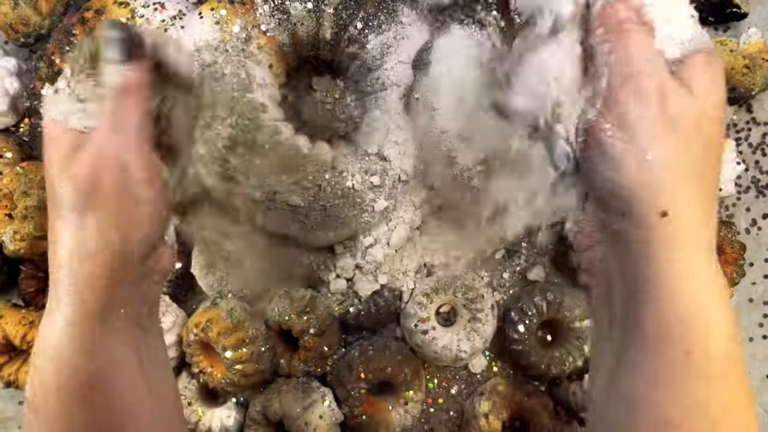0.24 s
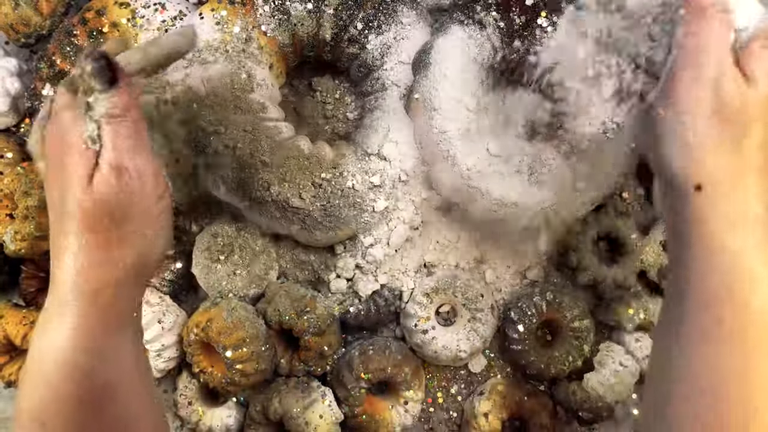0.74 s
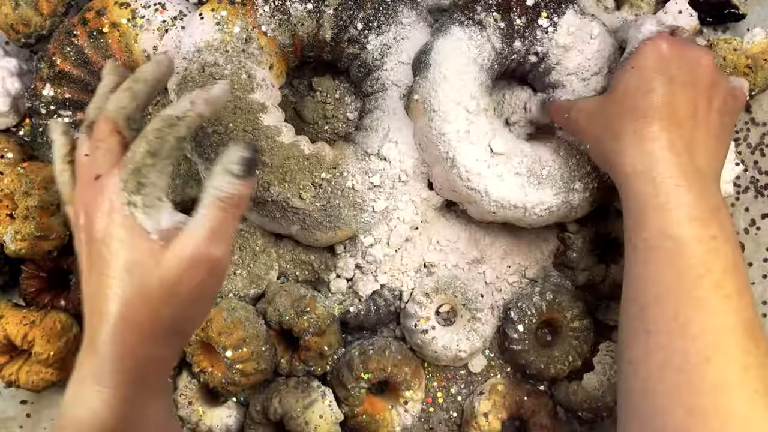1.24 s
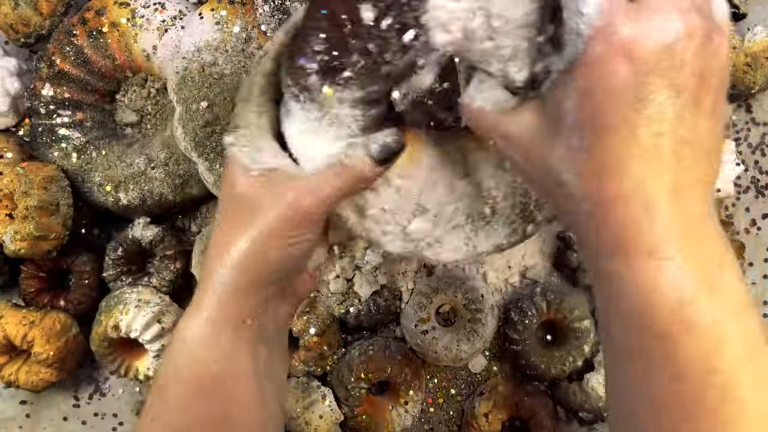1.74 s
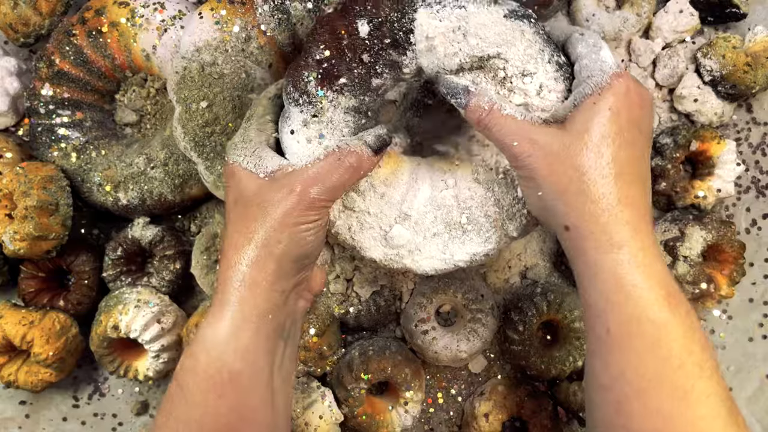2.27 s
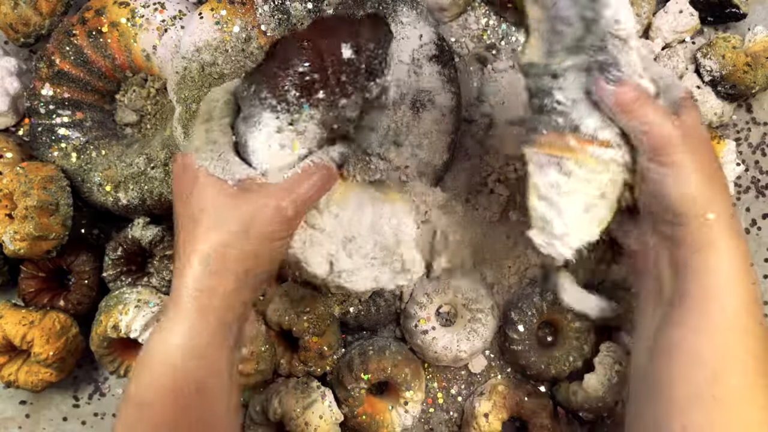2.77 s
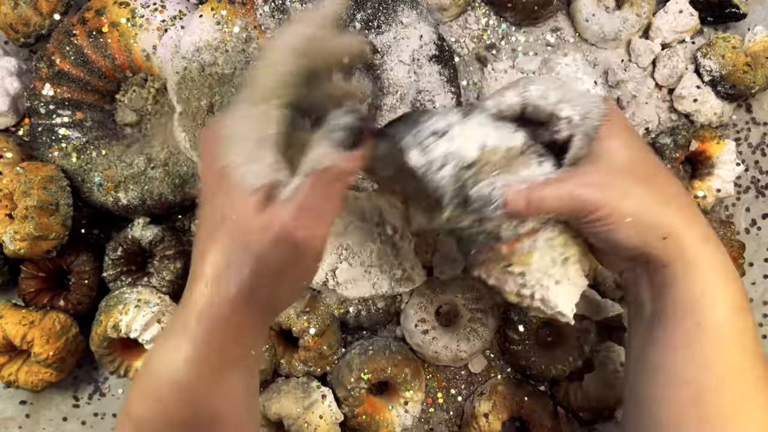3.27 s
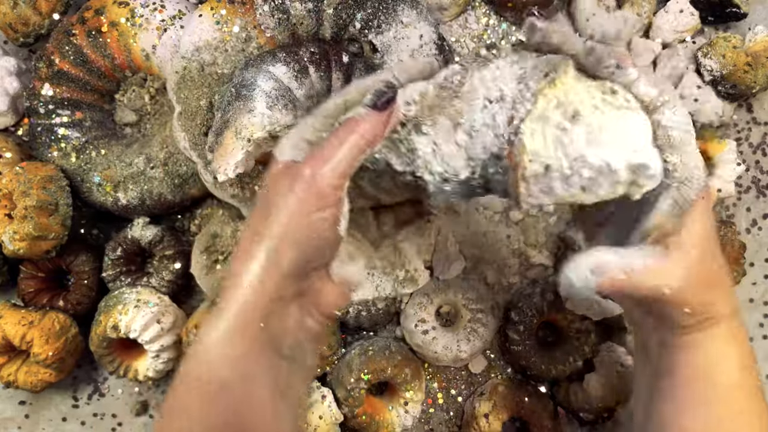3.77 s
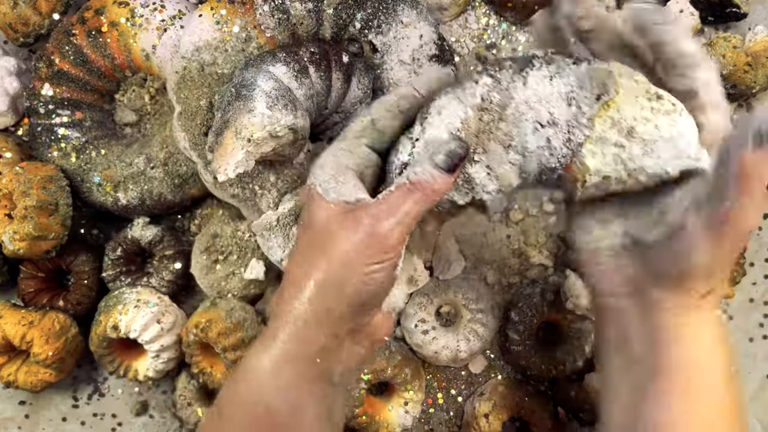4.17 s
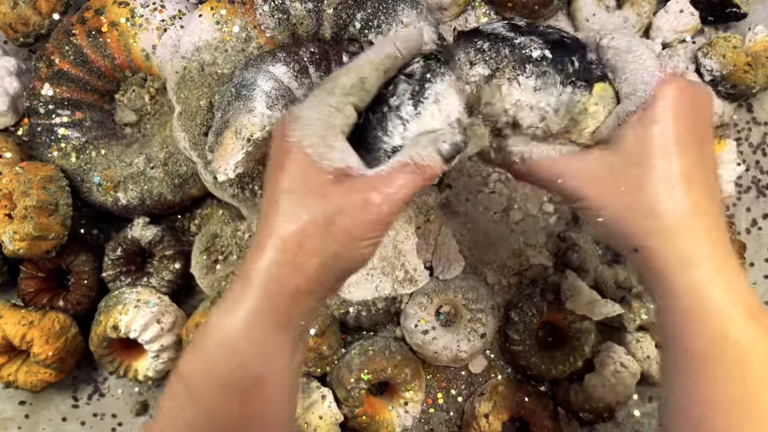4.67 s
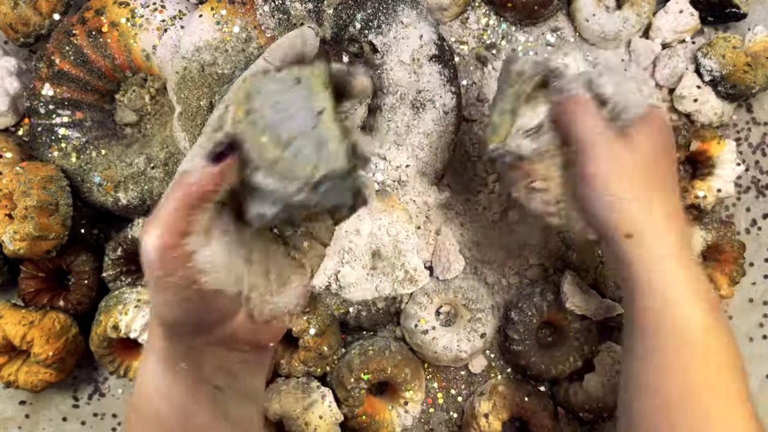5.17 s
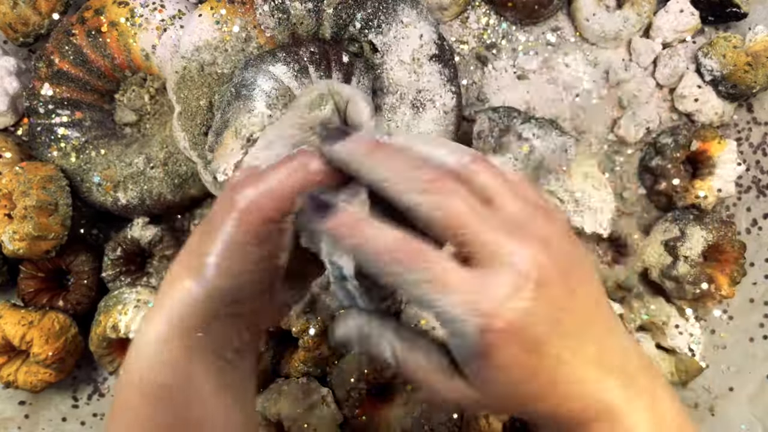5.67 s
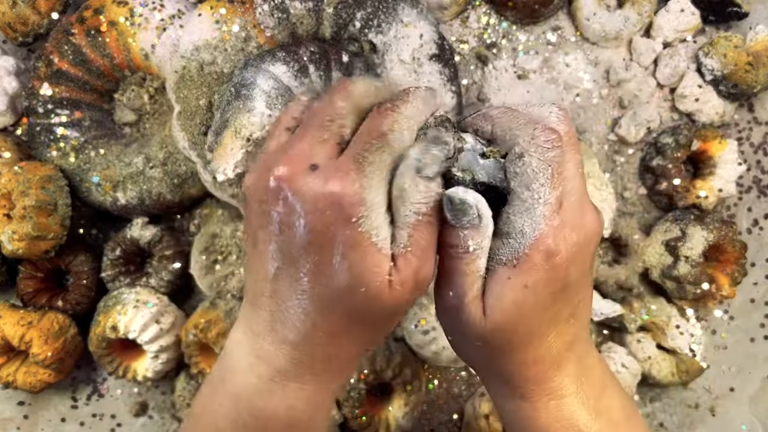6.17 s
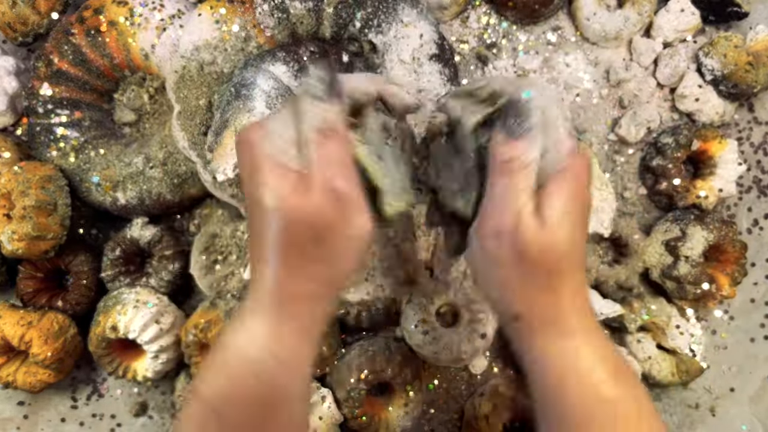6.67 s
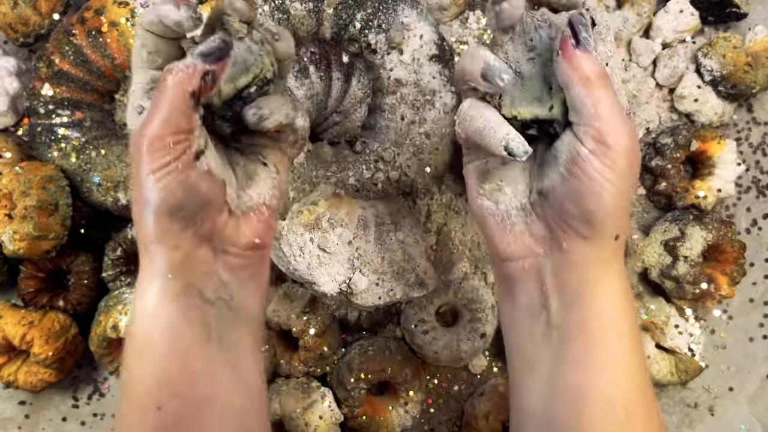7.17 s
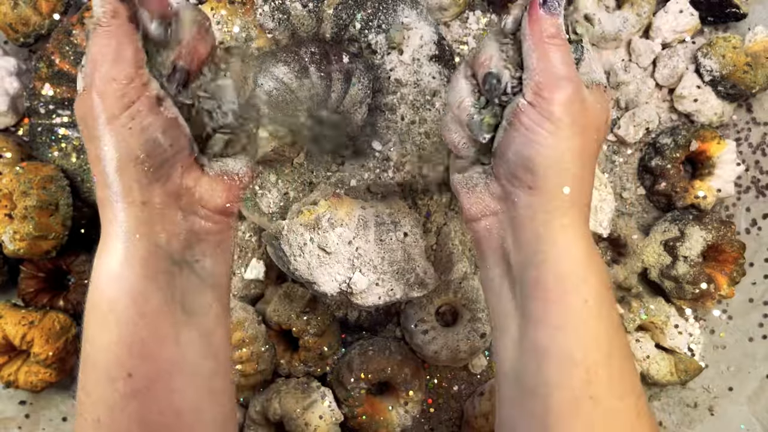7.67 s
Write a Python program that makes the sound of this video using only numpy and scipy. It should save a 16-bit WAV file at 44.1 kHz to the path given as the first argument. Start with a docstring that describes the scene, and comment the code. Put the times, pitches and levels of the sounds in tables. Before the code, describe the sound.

Hands crush dry chalky blocks up close: crisp snaps, gritty crumbling, fizzing powder and dull low thumps as pieces break and the heap shifts.

```python
"""Chalk crushed by hand

Two hands crush dry chalk blocks over a heap on a table, close to one microphone, for about eight
seconds. Gritty hiss and grains make the rubbed powder and crumbs; noise bursts through resonances make
snaps, clods and scraping squeaks. Lumps push the table with a slowing low swing and a hollow crunch.
A sine makes the low ring of the table top, and filtered noise the shifting heap, hum and room."""
import sys
import numpy as np
from scipy import signal
from scipy.fft import rfft, irfft, next_fast_len
from scipy.io import wavfile
from scipy.ndimage import uniform_filter1d, map_coordinates

SR = 44100
rng = np.random.default_rng(int(sys.argv[2]) if len(sys.argv) > 2 else 0)


def output_pcm(signal):
    """Save a mono or channel-first signal as 16-bit PCM at the path in sys.argv[1].

    Samples are clipped to [-1, 1] before scaling.
    """
    pcm = np.clip(np.atleast_2d(signal).T, -1, 1) * 32767
    wavfile.write(sys.argv[1], SR, np.round(pcm).astype(np.int16))


def voltage_ratio(level):
    """Linear amplitude factor for a level in decibels (scalar or array-like)."""
    return 10 ** (np.asarray(level, float) / 20)


N = 349272  # samples

# powder running off the hands between strokes: (t/s, level/dB)
POWDER_TRICKLE = [(0, -38), (.55, -36.5), (.8, -39.5), (1.0, -37.5), (1.15, -46), (1.47, -57), (2.33, -62),
                  (2.42, -39), (2.7, -45), (3.2, -55), (3.6, -47.5), (4.55, -44.5), (4.8, -38),
                  (5.08, -46.5), (5.45, -45.5), (5.9, -40.5), (6.55, -55), (6.78, -38.5), (7.2, -43.5),
                  (7.45, -42.5), (7.92, -43.5)]


def unit(x):
    """Scaled to rms 1."""
    return x / np.sqrt(np.mean(x ** 2) + 1e-20)


def curves(rows):
    """One value per sample for each column after the time."""
    s, *cols = np.transpose(rows)
    return [np.interp(np.arange(N) / SR, s, c) for c in cols]


def wobble(rate):
    """A smooth random curve, rate knots a second (60 at most)."""
    knots = rng.standard_normal(int(N * 60 / SR) + 4)
    return map_coordinates(knots, [np.arange(N) * min(rate, 60) / SR])


def swells(rows, rise_db_per_s, fall_db_per_s):
    """Summed power of events (t/s, level/dB, hold/s) that rise, hold and fall."""
    t = np.arange(N) / SR
    power = np.zeros(N)
    for s, db, hold in rows:
        rise = rise_db_per_s * np.maximum(s - t, 0)
        fall = fall_db_per_s * np.maximum(t - s - hold, 0)
        power += voltage_ratio(db - rise - fall) ** 2
    return power


def filtered(x, response):
    """x times a complex response of frequency."""
    m = next_fast_len(len(x) + 8192)
    return irfft(rfft(x, m) * response(np.fft.rfftfreq(m, 1 / SR)), m)[:len(x)]


def colour(points):
    """Gain through (f/Hz, level/dB) points on a log frequency axis, -90 dB beyond both ends."""
    hz, db = np.transpose(points)
    return lambda f: voltage_ratio(np.interp(np.log(f + 1), np.log(hz), db, left=-90, right=-90))


def modes(rows):
    """Causal sum of resonances (f/Hz, width/Hz, level/dB) with alternating signs."""
    def response(f):
        total = 0
        for k, (centre, width, db) in enumerate(rows):
            damping = 1j * f * width
            total = total + (-1) ** k * voltage_ratio(db) * damping / (centre * centre - f * f + damping)
        return total
    return response


def grains(count, centre_hz, spread, cycles, size_db, length):
    """Tiny damped rings at random moments, pitches and sizes, each length samples long."""
    moment, pitch, size = rng.random(count), rng.standard_normal(count), rng.exponential(size=count)
    hz = np.clip(centre_hz * np.exp(spread * pitch), 200, 15000)[:, None]
    t = np.arange(length) / SR
    gain = voltage_ratio(size_db * np.minimum(size, 5))[:, None]
    rings = gain * np.sin(2 * np.pi * hz * t) * np.exp(-t * hz / cycles)
    at = (moment * N).astype(int)[:, None] + np.arange(length)
    return unit(np.bincount(at.ravel(), rings.ravel(), N + length)[:N])


def gritty(spectrum, grit, share, patchy_db, banded_db):
    """Hiss in patches of random gain and passing narrow bands where pieces resonate, mixed with grains."""
    z = signal.stft(rng.standard_normal(N), nperseg=512)[2]
    patches, bands = rng.standard_normal((2, *z.shape))
    # patches are wide in frequency and brief; bands are narrow and last longer
    patches = unit(uniform_filter1d(uniform_filter1d(patches, 12, 0), 4, 1))
    bands = unit(uniform_filter1d(uniform_filter1d(bands, 3, 0), 14, 1))
    gain = voltage_ratio(patchy_db * patches + banded_db * np.clip(bands, 0, 2.5) ** 2)
    hiss = unit(signal.istft(z * gain, nperseg=512)[1][:N])
    mix = np.sqrt(1 - share) * hiss + np.sqrt(share) * grit  # share of the power in grains
    return unit(filtered(mix, colour(spectrum)))


def rubbing():
    """Level of the powder in dB: the trickle, the strokes and the sudden rushes add in power."""
    # finger strokes over the chalk: (t/s, level/dB, hold/s)
    stroke_rows = [(1.71, -45.5, 0.036), (1.8, -35, 0.072), (2.0, -39.5, 0.13), (2.12, -35.5, 0.033),
                   (2.63, -35, 0.0023), (2.8, -32.5, 0.076), (3.04, -37, 0.052), (3.42, -41.5, 0.028),
                   (3.75, -37, 0.011), (3.92, -35, 0.0062), (4.255, -30.5, .02), (4.412, -39, 0.011),
                   (4.84, -37.5, 0.012), (5.01, -39.5, 0.043), (5.15, -35, 0.03), (5.3, -36.5, 0.029),
                   (5.74, -28.5, 0.032), (6.04, -32, 0.017), (6.08, -32.5, 0.04), (6.21, -40, 0.012),
                   (6.265, -36, 0.048), (6.855, -36, 0.0024), (6.97, -31, 0.025), (7.195, -41, 0.044)]
    # sudden rushes of powder, some just after a snap: (t/s, level/dB, hold/s)
    rush_rows = [(2.362, -29.5, .002), (2.9, -23.5, .004), (4.157, -26.5, 0.037), (4.283, -23.5, 0.016),
                 (4.622, -29.5, 0.0028), (5.67, -25.5, 0.0092), (6.43, -39.5, 0.0036), (7.287, -19, 0.005),
                 (7.43, -38, 0.075)]
    trickle_db, = curves(POWDER_TRICKLE)
    strokes = swells(stroke_rows, rise_db_per_s=383, fall_db_per_s=309)
    rushes = swells(rush_rows, rise_db_per_s=2500, fall_db_per_s=254)
    return 10 * np.log10(voltage_ratio(trickle_db) ** 2 + strokes + rushes)


def grinding():
    """Powder fizzes under the skin; coarser crumbs crackle. Both follow the strokes of the fingers."""
    # (t/s, coarse crumbling before slips and strokes level/dB, tilt of the powder's top level/dB)
    grind_rows = [(0, -37.5, -23), (.5, -39.5, -15), (1.3, -51, -4), (1.92, -50.5, -16.5), (2.29, -49, -8),
                  (2.7, -44, -7), (2.9, -41.5, -14), (3.13, -49.5, -20.5), (3.97, -60, -7.5),
                  (4.81, -46, -12.5), (4.94, -61, -19), (5.7, -56.5, -7), (6.66, -51, -14),
                  (7.04, -49.5, -6.5), (7.3, -36, -16), (7.5, -31, -28), (7.75, -40, -18), (7.92, -38, -32)]
    # colour of the fine powder: (f/Hz, level/dB)
    powder_colour = [(1200, -15.5), (2800, -2), (5000, -1.5), (7500, 4), (9000, 2), (12000, 5),
                     (16000, 7.5)]
    # colour of the coarse crumbs: (f/Hz, level/dB)
    crumb_colour = [(200, 10), (400, 5), (1000, 2), (1600, -0.5), (2400, 0.5), (4000, -1), (7000, -27)]
    rub_db = rubbing()
    coarse_db, airy_db = curves(grind_rows)
    slips_db = 2.86 * wobble(45)

    fine_grit = grains(count=20000, centre_hz=8000, spread=0.45, cycles=1, size_db=4, length=48)
    fine = gritty(powder_colour, fine_grit, share=0.17, patchy_db=2.2, banded_db=1.5)
    coarse_grit = grains(count=9000, centre_hz=2700, spread=0.45, cycles=1.1, size_db=3.5, length=160)
    coarse = gritty(crumb_colour, coarse_grit, share=0.25, patchy_db=1.5, banded_db=1.9)

    # the top, above about 9 kHz, moves by the tilt; the rest moves half as far the other way
    top = filtered(fine, lambda f: 1 / (1 + (9000 / (f + 1)) ** 4))
    fine = voltage_ratio(-airy_db / 2) * (fine - top) + voltage_ratio(airy_db) * top
    stroke_db = rub_db - uniform_filter1d(rub_db, SR // 3)  # against the mean over a third of a second
    return voltage_ratio(rub_db + slips_db) * fine + voltage_ratio(coarse_db + slips_db + 0.7 * stroke_db) * coarse


def heap():
    """The heap shifts under the hands: low noise, always faintly there, that swells as it slides."""
    # the heap slides after a shove, before the flutter: (t/s, level/dB, hold/s)
    slide_rows = [(.93, -20.5, 0.051), (2.91, -12, 0.062), (5.36, -26.5, 0.048), (6.77, -29, 0.035),
                  (7.3, -24.5, 0.18)]
    # colour of the heap: (f/Hz, level/dB)
    heap_colour = [(18, 7.5), (28, 5), (50, 2.5), (66, 0), (84, 0.5), (105, -6.5), (200, -14.5), (400, -30),
                   (800, -44.5)]
    at_rest_db = -36.5
    slides = swells(slide_rows, rise_db_per_s=500, fall_db_per_s=52.5)
    sliding = np.sqrt(voltage_ratio(at_rest_db) ** 2 + slides)
    rumble = unit(filtered(rng.standard_normal(N), colour(heap_colour)))
    return sliding * voltage_ratio(1.94 * wobble(28)) * rumble


def room():
    """Faint steady hiss of the room and the microphone."""
    # colour of the hiss: (f/Hz, level/dB)
    room_colour = [(180, -49), (300, -3.5), (645, -8.5), (2500, -21.5), (8000, -19.5), (16000, -31)]
    return voltage_ratio(-50.0) * unit(filtered(rng.standard_normal(N), colour(room_colour)))


def crumbs(count):
    """Small breaks at random moments, rows (t/s, level/dB, f/Hz), following the trickle's level."""
    over_trickle_db, scatter_db = 7, 4  # the scatter only adds level
    middle_hz, log_spread = 4600, 0.5
    u, pitch = rng.random((count, 2)), rng.standard_normal(count)
    at = (u[:, 0] * N).astype(int)
    scatter = -scatter_db * np.log(np.maximum(u[:, 1], 0.15))
    db = curves(POWDER_TRICKLE)[0][at] + over_trickle_db + scatter
    hz = np.clip(middle_hz * np.exp(log_spread * pitch), 1500, 12000)
    return list(zip(at / SR, db, hz))


def cracks():
    """Each break: a sharp tick and a burst of splinters in a band set by its pitch, and a short ring."""
    # the clearest snaps and falling crumbs: (t/s, level before colouring level/dB, ring f/Hz)
    crack_rows = [(0.063, -15, 2600), (0.1028, -18.5, 2350), (0.168, -15.5, 2350), (0.195, -19, 7000),
                  (0.262, -10.5, 2300), (0.311, -15.5, 4170), (0.362, -20, 4020), (0.37, -9, 7700),
                  (0.391, -18, 7660), (0.4236, -16, 4900), (0.533, -18, 4330), (0.5497, -14.5, 2960),
                  (0.706, -20, 7500), (0.877, -16.5, 3160), (0.9525, -16, 7600), (1.36, -23, 8400),
                  (1.806, -18.5, 7000), (1.908, -22.5, 4940), (1.991, -14.5, 9450), (2.3605, -8.5, 3680),
                  (2.448, -25, 3000), (2.475, -17.5, 9050), (2.7044, -26, 4960), (2.776, -23, 6030),
                  (2.7911, -17.5, 3740), (2.896, -4.5, 3700), (2.8998, 1.5, 3080), (3.088, -19.5, 1760),
                  (3.362, -11, 6200), (3.581, -32, 5000), (3.7275, -38, 5000), (4.2795, 2.5, 7700),
                  (4.553, -21, 3940), (4.6184, -4.5, 6400), (4.68, -15, 6450), (4.931, -20.5, 4050),
                  (5.052, -23, 6500), (5.224, -17, 6500), (5.488, -22.5, 5170), (5.511, -15, 7400),
                  (5.748, -14.5, 6150), (5.809, -18.5, 4580), (5.97, -21, 5000), (5.998, -27, 2200),
                  (6.076, -25, 2500), (6.428, -21, 2330), (6.438, -26, 4000), (6.6188, -8.5, 2080),
                  (6.731, -22, 3630), (6.914, -22.5, 6230), (7.036, -23, 9000), (7.078, -19.5, 10700),
                  (7.246, -15.5, 5000), (7.2811, -4, 4800), (7.29, -14, 7100), (7.306, -1, 2870),
                  (7.3084, -13, 5900), (7.335, -6.5, 3240), (7.428, 0.5, 4180), (7.441, -13, 3480),
                  (7.487, -22, 9000), (7.518, -17, 3020), (7.55, -21, 4500), (7.581, -17, 3100),
                  (7.597, -18.5, 5000), (7.648, -12.5, 2540), (7.786, -12.5, 5930), (7.862, -13.5, 2600),
                  (7.898, -17.5, 6740)]
    # colour of tick and burst: (f/Hz, level/dB)
    snap_colour = [(600, 12.5), (3000, 4), (7500, 5.5), (11000, 5.5), (16000, -16)]
    t = np.arange(SR // 8) / SR
    snaps, rings = np.zeros((2, N + len(t)))
    for s, db, hz in crack_rows + crumbs(count=240):
        t60 = 0.015 * voltage_ratio(0.13 * db)  # s; small pieces die sooner
        fade = voltage_ratio(-60 * t / t60) * (1 - np.exp(-t / 0.0014))
        burst, noise = rng.standard_normal((2, len(t)))
        at = slice(round(s * SR), round(s * SR) + len(t))

        band = modes([(hz, 1.6 * hz, 0)])
        burst = unit(filtered(burst, lambda f: band(f) ** 2))
        tick = voltage_ratio(-60 * t / 0.0017) * burst
        tick = tick / np.abs(tick).max()
        snaps[at] += voltage_ratio(db) * (voltage_ratio(-10.5) * fade * burst + voltage_ratio(-1.0) * tick)

        splinters = voltage_ratio(-11) * fade * unit(filtered(noise, modes([(hz, hz / 3, 0)])))
        # the narrower ring lasts longer than the splinters
        ring = voltage_ratio(-11) * fade ** 0.4 * unit(filtered(noise, modes([(hz, hz / 14, 0)])))
        rings[at] += voltage_ratio(db) * (splinters + ring)
    return (filtered(snaps, colour(snap_colour)) + rings)[:N]


def clods():
    """A clod bursting in the fist: a fast noise burst through the clod's resonances."""
    # (t/s, level before onset and resonances level/dB, 60 dB decay/s)
    clod_rows = [(.064, -19, 0.044), (.268, -18, 0.098), (.392, -14.5, 0.069), (5.31, -27.5, 0.47),
                 (5.345, -21.5, 0.11), (6.991, -17.5, 0.12), (7.671, 2, 0.023), (7.6805, 11.5, 0.014),
                 (7.689, -7.5, 0.27)]
    # resonances: (f/Hz, width/Hz, level/dB)
    clod_modes = [(590, 224, 5), (1055, 280, 3.5), (1850, 890, -0.5)]
    t, envelope = np.arange(SR // 4) / SR, np.zeros(N + SR)
    for s, db, t60 in clod_rows:
        onset = 1 - np.exp(-t / 0.00039)
        envelope[round(s * SR):][:len(t)] += voltage_ratio(db - 60 * t / t60) * onset
    return filtered(envelope[:N] * rng.standard_normal(N), modes(clod_modes))


def squeaks():
    """A held piece sings while scraped: narrow noise that swells fast and fades over the scrape."""
    # (t/s, length/s, f/Hz, level before the swell level/dB)
    squeak_rows = [(0.168, 0.02, 2340, -26.5), (2.799, 0.084, 2500, -42), (3.042, 0.018, 2600, -37),
                   (3.362, 0.035, 2050, -37.5), (3.416, 0.031, 2020, -42.5), (4.786, 0.16, 4650, -41),
                   (5.007, 0.036, 4800, -37), (5.14, 0.038, 5000, -35), (5.15, 0.016, 3500, -34.5),
                   (5.306, 0.04, 3850, -41), (5.667, 0.02, 3380, -32)]
    out = np.zeros(N + SR)
    for s, length, hz, db in squeak_rows:
        noise = rng.standard_normal(SR // 4)
        u = np.arange(SR // 4) / SR / length  # 1 at the end of the scrape
        narrow = modes([(hz, hz / 11, 0)])
        tone = unit(filtered(filtered(noise, narrow), narrow))
        swell = (1 - np.exp(-8 * u)) * np.exp(-u ** 4)
        out[round(s * SR):][:len(u)] += voltage_ratio(db) * swell * tone
    return out[:N]


def lumps():
    """One push whose swing slows as it dies within a few cycles, and a knock and crunch in hollow blocks."""
    # lumps breaking or landing, levels before onset and filters:
    # (t/s, push level/dB, start f/Hz, hollow crunch level/dB)
    thump_rows = [(0.951, -6, 74, -1), (1.026, -7.5, 70, -6), (1.754, -11, 74, -41),
                  (1.987, -13, 56.5, -33), (2.359, 0.5, 84.5, 0.5), (2.789, -7, 340, 1.5),
                  (2.9, 8, 167, 9.5), (3.098, -5, 148, 0), (3.11, -8, 200, -6.5), (4.6187, -0.5, 304, -3),
                  (5.343, -7, 86.5, -0.5), (5.356, -6.5, 200, -8.5), (5.686, -15, 80.5, -24),
                  (5.752, -13.5, 114, -32), (6.6191, 0.5, 297, -0.5), (6.765, -24, 71, -6),
                  (7.281, -1.5, 129, -30), (7.288, -2, 82.5, -1.5), (7.389, -15.5, 80, -11),
                  (7.427, 0, 160, -3.5), (7.518, -10, 81.5, 0)]
    # resonances of the hollow blocks: (f/Hz, width/Hz, level/dB)
    hollow_modes = [(160, 164, 2), (341, 217, 2), (596, 320, -1.5)]
    slowing = 0.56  # power of time in the swing
    knock_db = -1  # the first clean knock, over the crunch
    crunch_over_push = 3.52  # the heap dulls the crunch above this multiple of the start pitch
    t, pushes, crunch = np.arange(SR // 4) / SR, np.zeros(N + SR), np.zeros(N + SR)
    for s, db, hz, crunch_db in thump_rows:
        swing = np.sin(np.pi * (2 * hz * t) ** slowing) * (1 - np.exp(-t * hz / 0.13))
        pushes[round(s * SR):][:len(t)] += voltage_ratio(db - 60 * t * hz / 9) * swing
        # a lump that crumbles more than it pushes keeps crunching longer
        t60 = np.clip(0.15 * voltage_ratio(0.5 * (crunch_db - db)), 0.03, 0.4)
        grit = voltage_ratio(-60 * t / t60) * rng.standard_normal(len(t)) + voltage_ratio(knock_db) * (t == 0)
        dulled = filtered(grit, lambda f: 1 / (1 + 1j * f / (crunch_over_push * hz)) ** 2)
        crunch[round(s * SR):][:len(t)] += voltage_ratio(crunch_db) * dulled
    return pushes[:N] + filtered(crunch[:N], modes(hollow_modes))


def table_ring():
    """The table top rings at one low, slightly wavering pitch: a sine under swelling levels."""
    # the table top set ringing, before the flutter: (t/s, level/dB, hold/s)
    ring_rows = [(.97, -25, 0.18), (1.42, -30, 0.055), (2.94, -16.5, 0.18), (3.22, -30, 0.21),
                 (7.48, -31, 0.21)]
    ringing = np.sqrt(swells(ring_rows, rise_db_per_s=350, fall_db_per_s=137))
    hz = 46 + 1.96 * wobble(13.0)
    ring = np.sqrt(2) * np.sin(2 * np.pi * np.cumsum(hz) / SR)
    return ringing * voltage_ratio(0.74 * wobble(14)) * ring


def low_hum():
    """A fuzzy low hum that comes and goes: noise through a narrow resonance."""
    # (t/s, level/dB, hold/s)
    hum_rows = [(3.316, -38.5, 0.85), (4.9, -41.5, 0.28)]
    humming = np.sqrt(swells(hum_rows, rise_db_per_s=350, fall_db_per_s=137))
    narrow = modes([(81.4, 8.8, 0)])
    return humming * unit(filtered(rng.standard_normal(N), lambda f: narrow(f) ** 2))


def scene():
    """All sources at the one microphone."""
    hands = grinding() + cracks() + clods() + squeaks()
    below = heap() + lumps() + table_ring() + low_hum()
    return (hands + below + room())[None]


def top_cut(x):
    """Nothing passes above the cut-off."""
    return signal.sosfilt(signal.butter(12, 16100, fs=SR, output="sos"), x)


def record(dry):
    """The loudest snaps overload the input, which bends sharply into a ceiling at full scale."""
    clipped = dry / (1 + np.abs(dry) ** 12) ** (1 / 12)
    return top_cut(clipped)


dry = scene()
out = record(dry)
output_pcm(out)
```